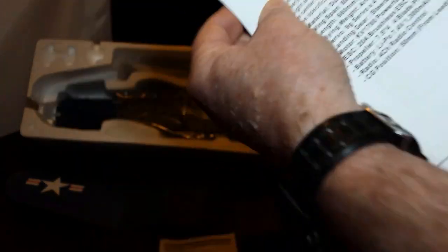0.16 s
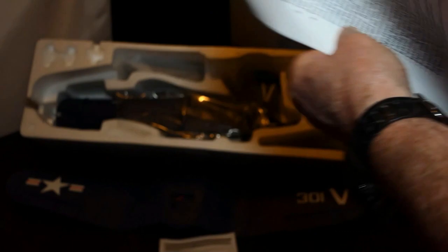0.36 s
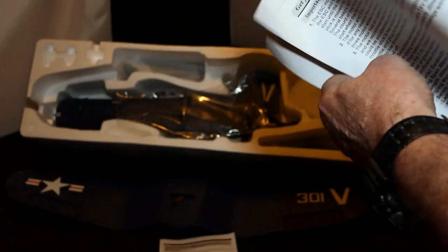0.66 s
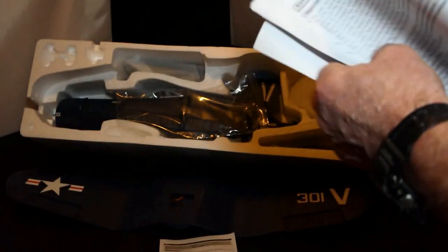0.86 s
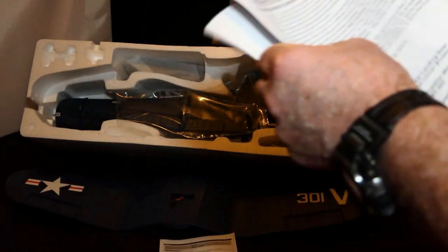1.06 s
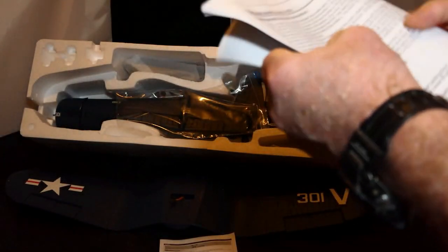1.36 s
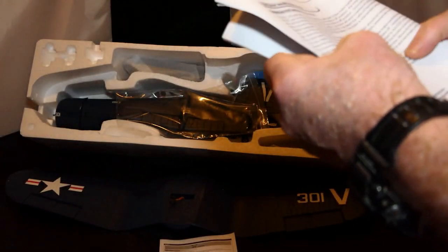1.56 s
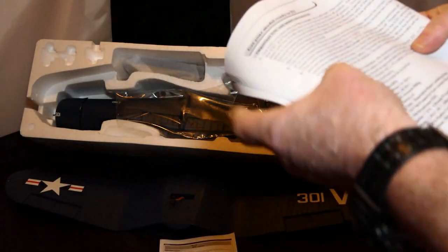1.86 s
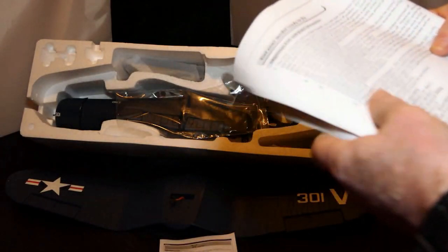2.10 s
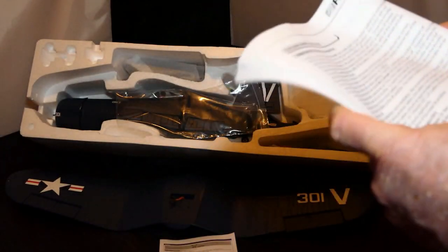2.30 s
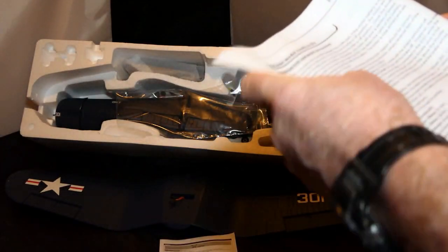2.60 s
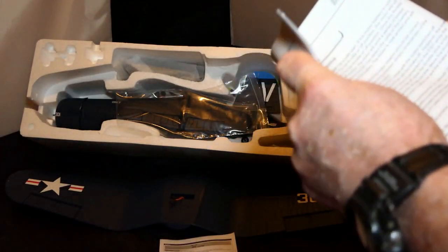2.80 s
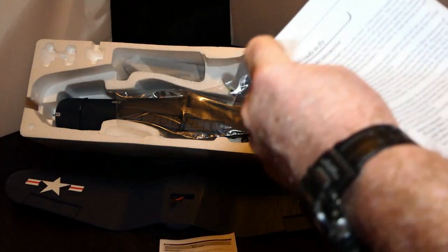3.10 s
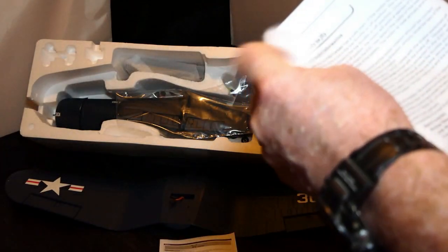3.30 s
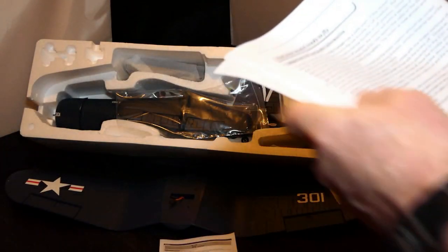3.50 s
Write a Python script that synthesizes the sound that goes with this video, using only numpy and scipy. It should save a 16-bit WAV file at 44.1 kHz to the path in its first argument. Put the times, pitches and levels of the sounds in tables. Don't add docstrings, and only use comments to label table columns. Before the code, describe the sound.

Paper pages snap and rustle in the hands, loudest at the very start, busy for over a second, then gentler turning with light ticks; close stereo pickup, short indoor reflections, low room hiss.

```python
import sys
import numpy as np
from scipy import signal
from scipy.fft import rfft, irfft
from scipy.io import wavfile
from scipy.ndimage import uniform_filter1d

SR = 44100
rng = np.random.default_rng(int(sys.argv[2]) if len(sys.argv) > 2 else 0)


def voltage_ratio(decibels):
    exponent = np.asarray(decibels, float) / 20
    return 10 ** exponent


def unload_audio(sound):
    columns = np.transpose(np.atleast_2d(sound))
    steps = np.round(np.clip(columns, -1, 1) * 32767)
    wavfile.write(sys.argv[1], SR, steps.astype(np.int16))


N = 160965

# [f/Hz, level/dB]
AIR_COLOUR = [(25, 27), (80, 2.5), (150, 2.5), (900, -2), (1500, -8), (6000, -10), (11000, -16),
              (15500, -26)]
# [f/Hz, level/dB]
ECHO_SIDE = [(60, 5), (200, -9), (1300, -2), (6000, -10), (13000, 2)]
# [t/s, level/dB, f/Hz]
THUMPS = [(0.04, -13.5, 370), (0.185, -27.5, 235), (0.282, -38, 276), (0.371, -30.5, 268),
          (0.441, -37, 217), (0.514, -25, 247), (0.577, -26, 206), (0.605, -28, 234), (0.64, -30.5, 158),
          (0.667, -38, 152), (0.37, -39.5, 93), (0.2, -44, 90), (1.197, -33.5, 86), (2.661, -45, 90),
          (0.75, -18.5, 370), (0.825, -47, 418), (0.905, -33, 216), (1.033, -46.5, 298), (1.204, -26, 230),
          (1.453, -35.5, 235), (2.313, -33.5, 233), (2.359, -39, 206), (2.442, -36.5, 223),
          (2.563, -34.5, 230), (2.624, -31, 234), (2.668, -35, 188), (2.745, -29.5, 284),
          (3.11, -35.5, 253), (3.148, -34.5, 242), (3.217, -27, 282), (3.473, -34.5, 226)]
# [f/Hz, level/dB]
PAPER_COLOUR = [(59, -83), (100, -38), (218, 0), (477, -6.5), (808, -1), (917, -3), (4460, -7),
                (10400, -12.5), (15500, -34.5)]
# [peak t/s, rise/s, fall/s, level/dB,
# centre/octaves above 1 kHz]
PAPER_SLIDES = [(.01, 0.0078, 0.12, -52.5, 0.5), (0.203, 0.091, 0.024, -36, 18),
                (.36, 0.073, 0.16, -44, 8), (0.536, 0.018, 0.0041, -27.5, 1.5),
                (0.584, 0.033, 0.012, -30, -6), (0.702, 0.059, 0.12, -39, -19),
                (0.757, 0.019, 0.0056, -33, 1.2), (1.001, 0.038, 0.06, -32.5, 5.5),
                (1.12, 0.016, 0.069, -43.5, -1.5), (1.223, 0.047, 0.019, -35.5, 7),
                (1.268, 0.018, 0.034, -42.5, 1.4), (1.36, 0.046, 0.024, -47.5, 2.5),
                (1.46, 0.032, 0.04, -44, 4.5),
                (1.618, 0.045, 0.031, -42.5, 0.27), (1.72, 0.034, 0.063, -42.5, 2.48),
                  (1.81, 0.02, 0.025, -42, 1.04), (1.91, 0.022, 0.023, -48.5, 4.1),
                  (2.141, 0.1, 0.028, -43, 2.13), (2.299, 0.089, 0.041, -41.5, 2.56),
                  (2.471, 0.035, 0.032, -44.5, 1.9), (2.66, 0.02, 0.1, -56, 1.4),
                  (2.738, 0.16, 0.06, -39.5, 1.93), (2.999, 0.041, 0.045, -44, 2.15),
                  (3.13, 0.063, 0.027, -47, 4), (3.281, 0.05, 0.016, -40, 1.49),
                  (3.419, 0.013, 0.028, -46.5, 1.9), (3.52, 0.11, 0.32, -49, 2.05),
                  (3.63, 0.12, 0.058, -50, 3.5)]
CURLS = [
    (.335, 0.0047, 0.023, -44, 0.79),
    (0.841, 0.011, .022, -41.5, .75),
    (1.004, 0.0048, 0.0065, -36, 0.72),
    (2.414, 0.0056, 0.0063, -37.5, 1.63),
    (2.48, 0.028, .02, -53, 1.43),
    (2.67, 0.024, 0.049, -54, 2.37),
    (2.74, 0.033, 0.016, -48, 2.25),
    (3.272, 0.0053, 0.011, -45, 1.12),
    (3.42, 0.031, .015, -49.5, 1.52),
]
# [t/s, level/dB, ring f/Hz, crack top/octaves above 1 kHz, body level/dB]
CRISP_CREASES = [(0.037, -2.5, 1226, 2.76, -8.5), (0.104, -2.5, 1750, 2.41, -3),
                 (0.1883, -19.5, 3720, 1.65, -5), (0.196, -23, 6000, 1.8, 8),
                 (0.202, -20.5, 7500, 2.86, -12), (0.524, -24, 2930, 1.27, -1), (0.528, -22, 4430, 1.8, 1),
                 (0.531, -9.5, 4450, 2.5, -3), (0.536, -13, 5260, 2.5, -1), (0.753, -19.5, 1005, 3.3, 0),
                 (0.758, -12.5, 2130, 2.24, -3.5), (0.962, -22, 5300, 2.1, 1), (1.062, -23, 5500, 3.1, -8),
                 (1.225, -23, 1160, 1.67, -3), (1.732, -18, 2870, 2.33, -8.5), (1.887, -21, 1920, 2.15, -7),
                 (1.92, -26.5, 5950, 2.6, -6), (2.24, -31, 5070, 2.9, -4), (2.279, -27.5, 2840, 2.2, 0),
                 (2.406, -20.5, 4370, 2.53, -1)]
FIRM_CREASES = [(0.179, -15.5, 1750, 2.2, 1), (0.224, -18, 5800, 1.93, -2), (0.322, -15.5, 1815, 1.92, 3.5),
                (0.417, -31.5, 1900, 1.7, -2), (0.493, -21, 873, 1.9, -2), (0.632, -23.5, 720, 1.8, 2.5),
                (0.731, -18.5, 807, 1.7, 2), (0.826, -10, 577, 1.96, -13), (0.941, -31, 630, 2, -7.5),
                (0.995, -15, 1910, 1.43, 4), (1.022, -37, 1750, 2.1, 0), (1.104, -24.5, 820, 2, 1.5),
                (1.206, -26, 656, 1.58, 3), (1.457, -20.5, 1237, 1.34, 4), (1.619, -35.5, 1720, 2, 4),
                (1.801, -36.5, 884, 2.3, -1), (2.311, -28.5, 3450, 1.74, -10), (2.465, -37, 2690, 1.9, -1),
                (2.568, -32.5, 3500, 1.82, -4), (2.611, -35, 2750, 3.1, 5), (2.646, -22.5, 3360, 2.05, 7.5),
                (3.186, -30.5, 895, 1.42, -10), (3.4, -43, 2850, 2.3, 11)]
DULL_CREASES = [(0.029, -36, 800, 1, 10.5), (0.282, -33, 560, 0.25, -6), (1.041, -14.5, 830, 1.14, 1.5),
                (1.153, -34.5, 1010, 1.6, 10), (1.173, -21.5, 820, 0.55, 1), (1.261, -22, 905, 0.28, 3.5),
                (1.299, -22, 1130, 0.35, -12), (1.422, -48, 657, 0.97, 6), (1.544, -41, 643, 1, 7),
                (1.583, -26.5, 732, 1.23, 5.5), (1.641, -29.5, 810, 0.6, -7), (1.822, -24, 813, 0.57, -1.5),
                (2.362, -28, 1090, 0.67, 5.5), (2.446, -34, 860, 0.19, -2), (2.671, -32.5, 890, 0.4, -11),
                (2.75, -27.5, 1270, 0.57, -2.5), (2.797, -38.5, 814, 1.37, 8.5),
                (2.947, -31, 900, 0.98, -6), (3.22, -36.5, 490, 0.33, -3), (3.475, -31.5, 696, 1.25, -7),
                (3.526, -36.5, 1310, 0.87, 8.5)]

AIR_DB, AIR_SIDE = -48.5, 0.94

FIRST_ECHO_S, ROOM_DB = 0.0014, 1
ROOM_T60_S, ROOM_TREBLE_T60_S = 0.33, 0.21
EARLY_T60_S, EARLY_DB = 0.06, 6
POSE_S = 0.11

RING_SPREAD = 0.1023
THUMP_CYCLES, SNAP_CYCLES = 1.7, 5

SLIDE_OCT, SLIDE_SKIRT_DB = 0.52, -10
CURL_OCT, CURL_SKIRT_DB = 0.13, -24
GRAINS_PER_S, GRAIN_DB, FLUTTER_DB = 2000, 2, 1.5
KNOCKS_PER_S, KNOCK_SPREAD_DB, KNOCK_DB = 53, 2, -13.5
KNOCK_OCT, KNOCK_WIDTH_OCT = -0.083, 0.67
KNOCK_GRIP = 1

CRACK_S, CRACK_LAG_S = 0.000447, 0.001182
CRACK_FALL_DB, CRACK_RISE_DB, BELOW_DB = -9.5, -1.5, 12
CRACK_OCT = 1.06
BODY_DB, BODY_OCT, RING_DB = 2.5, 0.18, -5

PAN_DB, MIC_LOW_HZ, MIC_TOP_HZ = -0.93, 121, 15500


def shade(x, db_of_oct):
    n = x.shape[-1]
    hz = np.arange(n // 2 + 1) * SR / n
    octs = np.log2(np.maximum(hz, 1) / 1000)
    return irfft(rfft(x) * voltage_ratio(db_of_oct(octs)), n)


def curve(table):
    hz, db = np.array(table, float).T
    return lambda octs: np.interp(octs, np.log2(hz / 1000), db)


def bell(centre, width):
    return lambda octs: -4.3 * ((octs - centre) / max(width, .1)) ** 2


def unit(x):
    return x / np.sqrt(np.mean(x ** 2))


def walk(rate):
    k = max(int(SR / rate), 2)
    once = uniform_filter1d(rng.standard_normal(N), k)
    return unit(uniform_filter1d(once, k))


def add(out, t, x):
    i = max(int(t * SR), 0)
    out[i:i + len(x)] += x[:N - i]


def ring(hz, cycles, chance):
    t = np.arange(4096) / SR
    f = hz * np.exp(RING_SPREAD * chance)[:, None]
    tones = np.sin(2 * np.pi * f * t) * np.exp(-t * f / max(cycles, .3))
    x = np.sum(tones, axis=0)
    return x / np.abs(x).max()


def grains(per_s, spread_db):
    pick = rng.random((3, N))
    happens = pick[0] < per_s / SR
    sign = np.sign(pick[1] - .5)
    size = voltage_ratio(-spread_db * np.log(pick[2] + .02))
    return unit(happens * sign * size)


def air():
    mid = unit(shade(rng.standard_normal(N), curve(AIR_COLOUR)))
    side = unit(shade(rng.standard_normal(N), curve(AIR_COLOUR)))
    return voltage_ratio(AIR_DB) * (mid + AIR_SIDE * side * np.array([[1], [-1]]))


def room(x):
    t, hop = np.arange(SR // 3) / SR, int(POSE_S * SR)
    start = np.clip((t - FIRST_ECHO_S) / 0.00027, 0, 1)
    fade = lambda t60: np.exp(-np.log(1000) * t / t60) * start
    window = signal.windows.hann(2 * hop, False)
    out, x = np.zeros((2, N + SR)), np.pad(x, (hop, SR))
    for i in range(0, N + hop, hop):
        mid, side = rng.standard_normal((2, len(t)))
        echoes = mid + shade(side, curve(ECHO_SIDE)) * np.array([[1], [-1]])
        low = shade(echoes, lambda o: -6 * np.maximum(o - 1, 0))
        tail = low * fade(ROOM_T60_S) + (echoes - low) * fade(ROOM_TREBLE_T60_S)
        tail = tail + voltage_ratio(EARLY_DB) * echoes * fade(EARLY_T60_S)
        wet = signal.fftconvolve(x[None, i:i + 2 * hop] * window, unit(tail), axes=1)
        out[:, i:i + wet.shape[1]] += wet * voltage_ratio(ROOM_DB) / np.sqrt(len(t))
    return out[:, hop:hop + N]


def thumps():
    out = np.zeros(N)
    onset = np.minimum(np.arange(4096) / SR / 0.0043, 1)
    for s, db, hz in THUMPS:
        add(out, s, voltage_ratio(db) * onset * ring(hz, THUMP_CYCLES, rng.standard_normal(3)))
    return out


def slides():
    out, t = np.zeros(N), np.arange(N) / SR
    rub = rng.standard_normal(N) + grains(GRAINS_PER_S, GRAIN_DB)
    rub = shade(rub * voltage_ratio(FLUTTER_DB * walk(39)), curve(PAPER_COLOUR))
    knocks = unit(shade(grains(KNOCKS_PER_S, KNOCK_SPREAD_DB), bell(KNOCK_OCT, KNOCK_WIDTH_OCT)))
    strokes = [(*row, SLIDE_OCT, SLIDE_SKIRT_DB) for row in PAPER_SLIDES]
    strokes += [(*row, CURL_OCT, CURL_SKIRT_DB) for row in CURLS]
    for s, rise, fall, db, centre, width, skirt_db in strokes:
        a, b = max(int((s - .4) * SR), 0), int((s + .4) * SR)
        band = lambda o: -skirt_db * (np.exp(-.5 * ((o - centre) / width) ** 2) - 1)
        hiss = unit(shade(rub[a:b], band))
        knocking = voltage_ratio(KNOCK_DB + KNOCK_GRIP * (db + 29.5)) * knocks[a:b]
        d = t[a:b] - s
        swell = np.exp(-.5 * (d / np.where(d < 0, max(rise, .004), max(fall, .004))) ** 2)
        out[a:b] += voltage_ratio(db) * (hiss + knocking) * swell
    return out


def crack_colour(top, centre):
    def gain(o):
        above = np.maximum(o - top, 0)
        below = np.minimum(o - top + CRACK_OCT, 0)
        far_below = np.minimum(o - min(centre, top) + 1, 0)
        return CRACK_FALL_DB * above * (1 + above) + CRACK_RISE_DB * below + BELOW_DB * far_below
    return gain


def snaps():
    out = np.zeros(N)
    n, lead = 2048, .004
    place = 31 * np.linspace(0, 1, n // 2 + 1) ** .6
    for s, db, hz, top, body_db in CRISP_CREASES + FIRM_CREASES + DULL_CREASES:
        chance = rng.standard_normal(36)
        smear = CRACK_S * 2 ** np.clip(2.8 - top, .7, 1.6)
        late = lead + smear * np.abs(np.interp(place, np.arange(32), chance[4:]))
        click = irfft(np.exp(-2j * np.pi * np.cumsum(late) * SR / n), n)
        centre = np.log2(hz / 1000)
        body = voltage_ratio(BODY_DB + body_db) * shade(click, bell(centre, BODY_OCT))
        crack = shade(click, crack_colour(top, centre)) + body
        add(out, s + CRACK_LAG_S - lead, voltage_ratio(db + 0.5) * crack / np.abs(crack).max())
        tone = ring(hz, SNAP_CYCLES, chance[:4] * [0, 0.4, 1.8, 2.46])
        add(out, s + CRACK_LAG_S, voltage_ratio(db + RING_DB + body_db) * tone)
    return out


def scene():
    paper = snaps() + voltage_ratio(-4.0) * slides() + voltage_ratio(-2.0) * thumps()
    pan = voltage_ratio(np.array([[PAN_DB], [-PAN_DB]]) / 2)
    return (paper + room(paper)) * pan + air()


def roll_off(x):
    return signal.sosfilt(signal.butter(12, 16470, fs=SR, output="sos"), x)


def record(dry):
    low_cut = signal.butter(3, MIC_LOW_HZ, "high", fs=SR, output="sos")
    top_cut = signal.ellip(8, .2, 70, MIC_TOP_HZ, fs=SR, output="sos")
    mix = signal.sosfilt(np.vstack([low_cut, top_cut]), dry)
    return roll_off(mix)


dry = scene()
out = record(dry)
unload_audio(out)
```